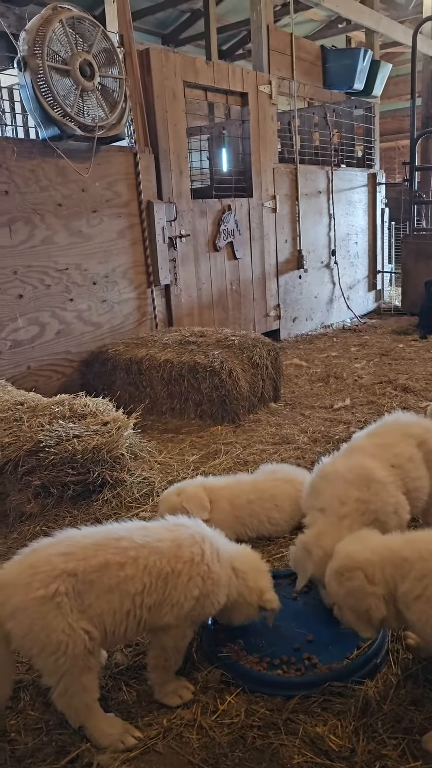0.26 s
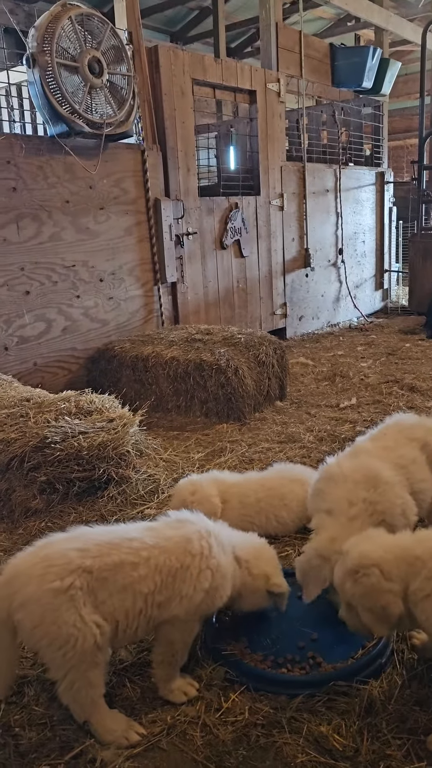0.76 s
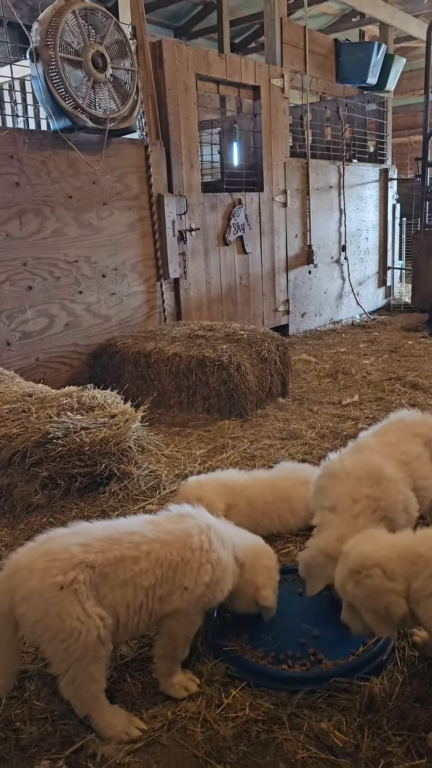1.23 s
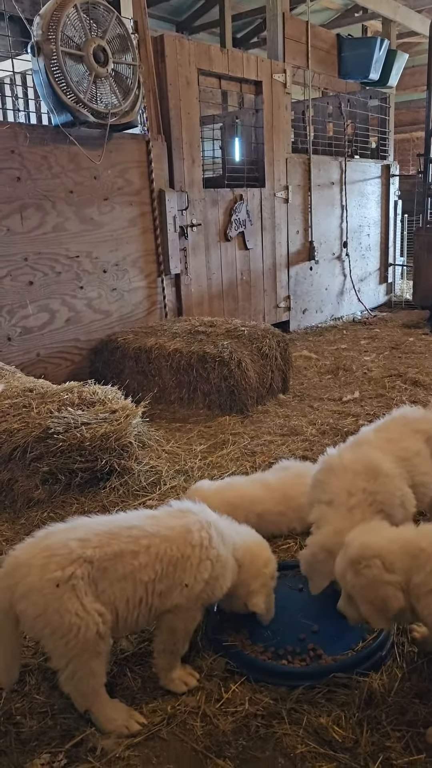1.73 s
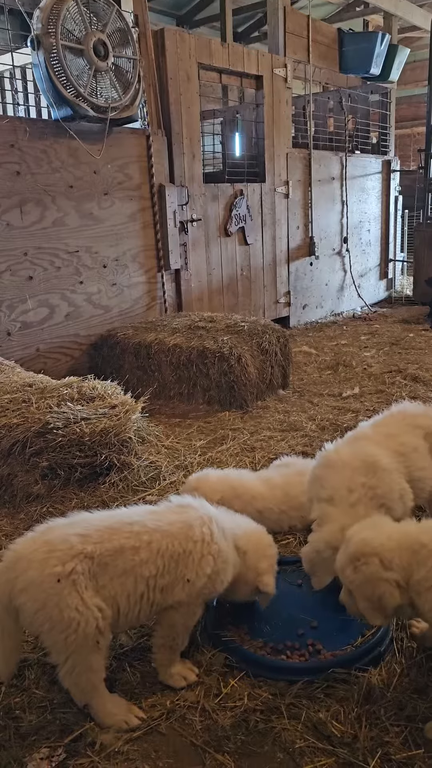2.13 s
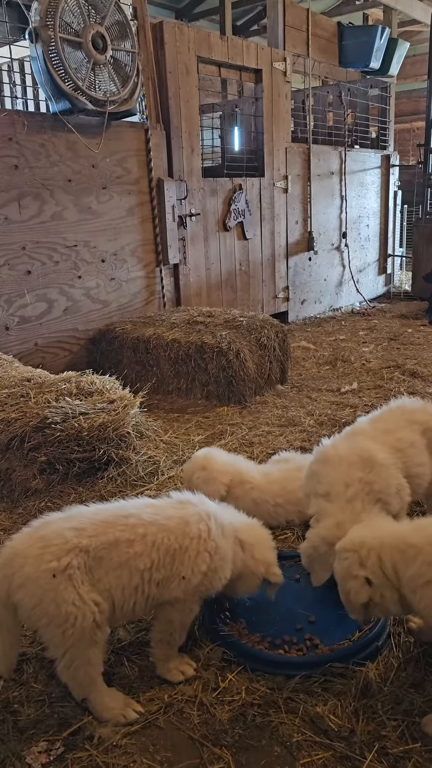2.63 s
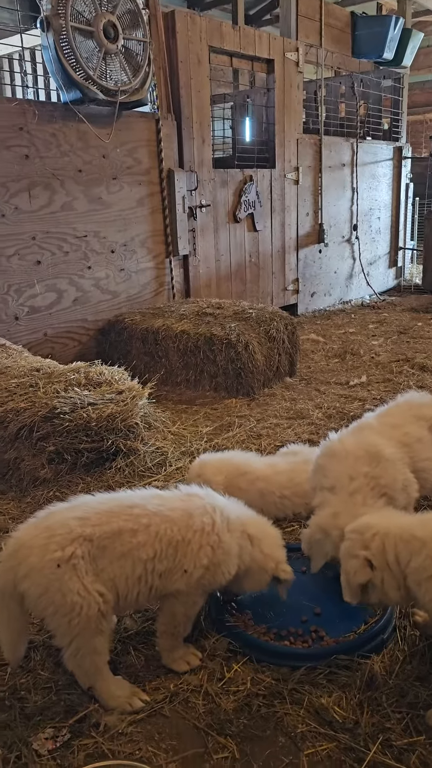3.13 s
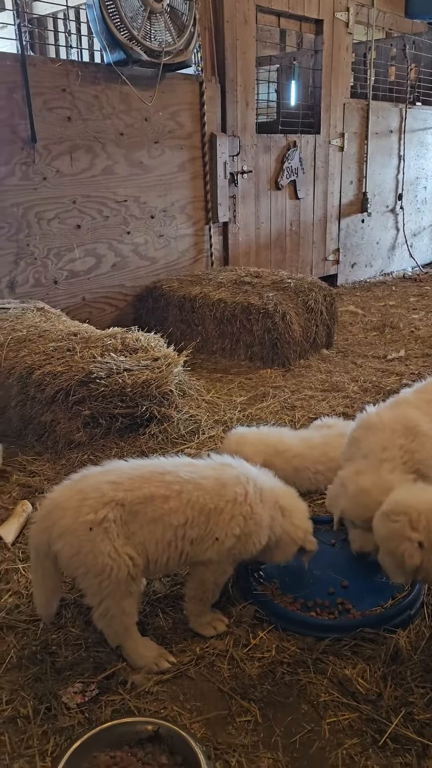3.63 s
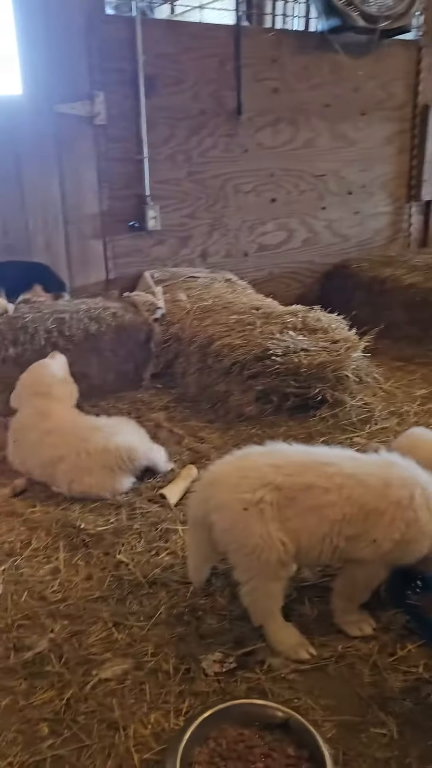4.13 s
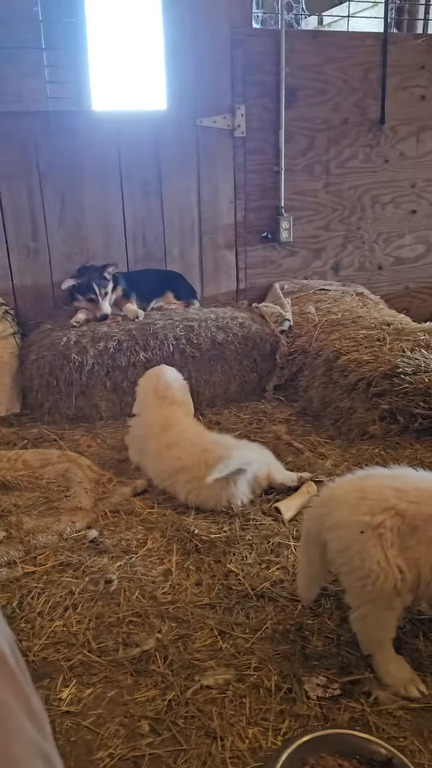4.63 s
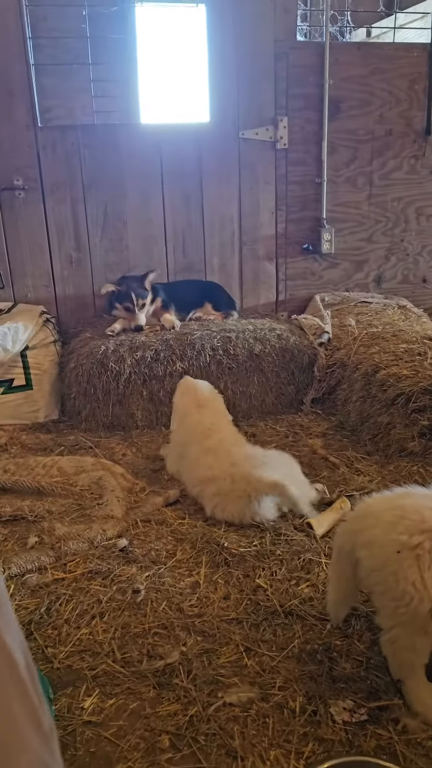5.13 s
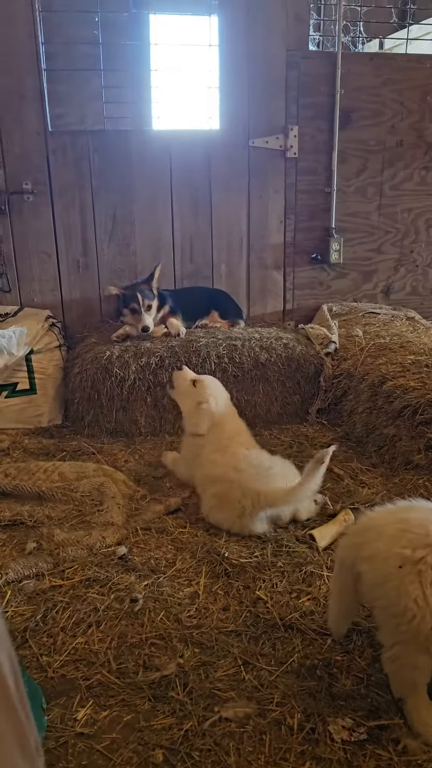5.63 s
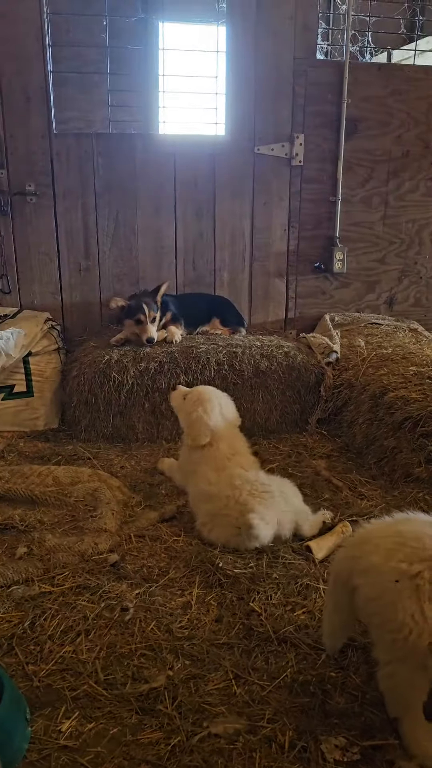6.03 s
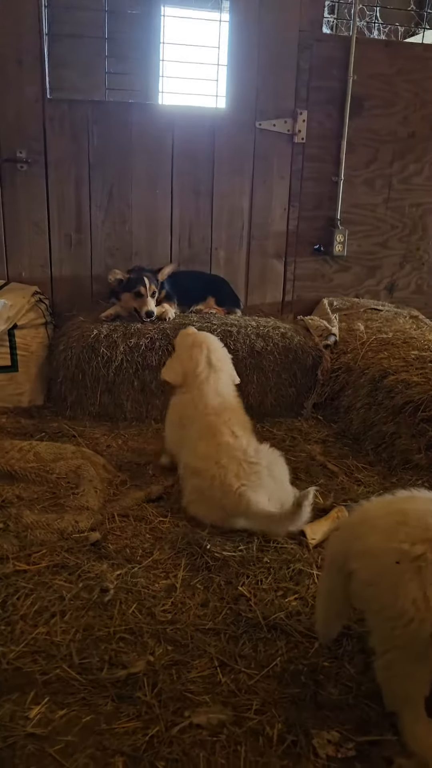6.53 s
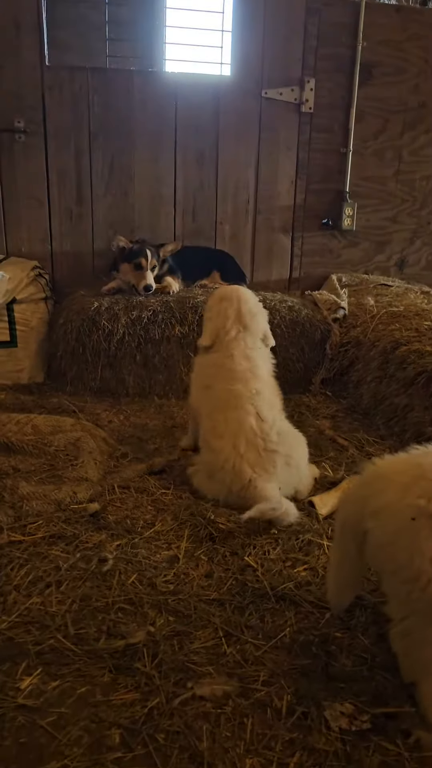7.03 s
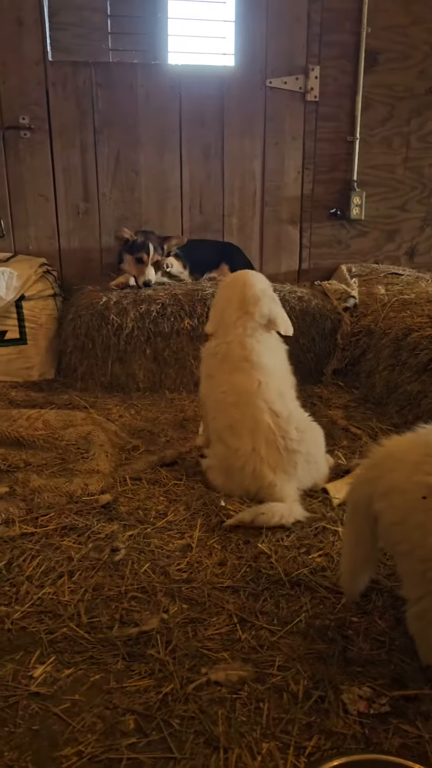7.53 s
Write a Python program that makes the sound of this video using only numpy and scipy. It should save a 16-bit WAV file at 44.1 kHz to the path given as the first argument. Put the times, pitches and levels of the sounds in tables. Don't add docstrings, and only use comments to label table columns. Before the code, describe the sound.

In a wooden barn, a puppy gives two gruff low barks, two short growls, then five loud sharp yaps over crunching kibble and rustling straw.

```python
import sys
import numpy as np
from scipy import signal
from scipy.fft import rfft, irfft
from scipy.io import wavfile
from scipy.ndimage import uniform_filter1d

SR = 44100
rng = np.random.default_rng(int(sys.argv[2]) if len(sys.argv) > 2 else 0)


def to_wav(s):
    ch = np.atleast_2d(s).T
    pcm = np.round(np.clip(ch, -1, 1) * 32767)
    wavfile.write(sys.argv[1], SR, pcm.astype(np.int16))


def gain_from_decibels(decibels):
    exponent = np.asarray(decibels, float) / 20
    return 10 ** exponent


N = 342657

# (time [s], pitch [Hz], effort [dB])
YAP_CURVES = [
    [(5.195, 193.8, -49), (5.25, 394, -34.5), (5.285, 607, -21), (5.312, 762.4, -12), (5.332, 817, -9),
     (5.358, 847.3, -10.5), (5.385, 890.4, -28.5), (5.42, 718, -32), (5.51, 312, -49.5)],
    [(5.585, 243.5, -45), (5.62, 464.7, -35), (5.655, 687.3, -15.5), (5.677, 787, -6.5),
     (5.705, 826, -18.5), (5.74, 802.3, -13), (5.78, 606.4, -32), (5.82, 425.3, -27.5), (5.87, 324, -74)],
    [(6.375, 331, -61.5), (6.4, 490.4, -29), (6.43, 621, -23), (6.45, 695, -13), (6.467, 757, -10.5),
     (6.5, 818, -22), (6.535, 795, -38), (6.58, 509, -49), (6.64, 304, -49.5)],
    [(6.655, 324, -54), (6.69, 528, -28), (6.72, 671, -18), (6.75, 824.2, -12.5), (6.785, 832.4, -14),
     (6.815, 793.7, -25.5), (6.85, 630, -32.5), (6.9, 393.5, -36), (6.96, 267, -52)],
    [(7.33, 253, -58), (7.372, 489.2, -29), (7.408, 734, -13), (7.445, 849, -8.5), (7.475, 861.5, -25.5),
     (7.49, 814, -12.5), (7.505, 735, -38.5), (7.54, 472.6, -30.5), (7.6, 305, -53)],
]
# (voice breaks at [s], depth of strong-weak pulses after it [ratio], brightness [dB per octave])
YAP_BREAKS = [
    (5.345, 1.03, 4),
    (5.689, 1.27, -2.1),
    (6.484, 1.9, -4.5),
    (6.742, 2.16, 0.5),
    (7.424, 0.55, 5.3),
]
YAP_HOARSENESS = [
    (.07, .1),
    (.065, .08),
    (.16, .15),
    (.07, .06),
    (.04, .09),
]
YAP_WIDE_OPEN = (0.68, 0.63, 0.7, 0.73, 0.68)
# (frequency [Hz], level [dB])
YAP_THROAT_COLOUR = [(250, -47), (420, -43), (560, -2), (800, 2.5), (1000, -12.5), (1260, 1), (1690, -11.5),
                     (2130, -6.5), (2500, -18), (3200, -22.5), (4200, -41), (5200, -47), (6500, -97.5)]
TONGUE_BANDS_HZ = (620, 770, 970, 1300, 1800, 2100, 2850, 3600, 4300, 4800)
TONGUE_CLIMBING = [
    (-5, 1.5, -16.5, -7, -4, 2.5, 1.5, 7, -2, -6),
    (0, 1.5, -2, -7.5, -11.5, 1.5, 1.5, 2, -3.5, -2),
    (-4, 1.9, -3, -7.5, 13, 4.4, 1.2, 14, 12, -5),
    (2, 2.1, 6, -11, 5.5, 1.4, -1.6, -1, -3.5, -6),
    (6.5, 1.5, 7.5, 3.5, -6, 4.9, 1.5, -4.5, -1, -9),
]
TONGUE_BROKEN = [
    (0.1, 0.1, -0.6, 1.5, 1, -0.5, 4, -4, -9, 15.5),
    (0.1, 0.1, -4, 0.1, -1.5, 4, 3, 5, 1.5, 14.5),
    (0.099, 0.1, -1.5, 0.1, 16, -7.5, -7.5, 1.5, 6.5, 1.5),
    (0.1, 0.1, 4.5, 0.1, 8.5, -1.5, -2, -1, -3, -7),
    (0.1, 0.1, 5.5, 1.5, -2, 0.5, -1.5, -11, -1, 9),
]

# (time [s], pitch [Hz], effort [dB])
WOOF_CURVES = [
    [(1.07, 144, -59), (1.125, 156, -38), (1.14, 191.7, -38.5), (1.15, 224, -39), (1.175, 247, -23.5),
     (1.21, 309, -23.5), (1.255, 316.6, -22), (1.275, 278.2, -25), (1.32, 209, -57)],
    [(2.185, 152.3, -79), (2.212, 163, -34), (2.228, 236, -27), (2.255, 271.9, -23.5), (2.29, 282.5, -18.5),
     (2.315, 274.8, -30), (2.335, 251.8, -22), (2.4, 210.5, -69)],
]
# (voice breaks at [s], depth of strong-weak pulses [ratio])
WOOF_SPLITS = [
    (1.12, 0.74),
    (2.201, 0.5),
]
WOOF_MOUTH_RULE = (0.46, 0.91, 0.012)
# (frequency [Hz], level [dB])
WOOF_EARLY_THROATS = [
    [(100, -48), (290, 1.5), (560, -1.5), (760, 14), (1000, 7.5), (1240, 14.5), (1500, -16), (1850, 3),
     (2300, -24), (2900, 6), (3500, 2.5), (4000, -11), (4500, -33), (5300, -48), (6200, -110)],
    [(100, -26.5), (290, 0), (600, -9.5), (950, 18.5), (1300, -2), (1650, -6.5), (2000, -9), (2500, -8),
     (3000, -7), (3500, -10.5), (4000, -7.5), (5300, -44.5), (6200, -83)],
]
# (frequency [Hz], level [dB])
FIRST_WOOF_THROAT = [(100, -42), (290, -12), (560, -1), (800, 3.5), (1000, 3.5), (1270, 16.5), (1550, -17),
                     (1870, 7), (2250, 7), (2550, 9), (2950, 6), (3300, -3), (3850, -4.5), (4400, -36),
                     (5300, -48), (6200, -114)]
# (frequency [Hz], level [dB])
SECOND_WOOF_OPEN = [(100, -29.5), (290, -20.5), (520, 4), (700, -9.5), (850, 7), (1100, -7.5), (1280, 13),
                    (1450, -23.5), (1680, 10), (1950, 9.5), (2500, 8.5), (2750, 1.5), (3050, 1), (3600, -4),
                    (4100, -22), (5300, -22.5), (6200, -81)]
# (time [s], duration [s])
JAW_FALLS = [
    (1.213, 0.016),
    (2.259, 0.038),
]

# (start [s], length [s], effort [dB], first pulse rate [Hz], last pulse rate [Hz])
GROWL_EVENTS = [
    (2.78, .52, -26.5, 99.9, 21.94),
    (3.765, 0.445, -29, 45.5, 50.53),
]
GROWL_ATTACK = (0.091, 0.058)
GROWL_RELEASE = (0.06, 0.14)
GROWL_SAG = (-10, 0.5)
# (start [dB], end [dB])
GROWL_ENDS = (-20, -30.5)
# (start [dB], end [dB])
GROWL_BRIGHTNESS = (0.5, -4)
GROWL_SLACKENING = (.48, 0.53)
GROWL_UNSTEADY = (.16, .04)
FLAP_SWELLS = (2.5, 1)
JAW_SETTLE = (.14, .095)
# (frequency [Hz], width [Hz], level [dB], frequency at start [Hz])
GROWL_CHESTS = [
    [(150, 42, 2, 124), (217, 54, -2.5, 168), (348, 64, -1.5, 500), (720, 43, -9, 803),
     (1090, 72, -20.5, 1390)],
    [(160, 28.6, -1, 155), (209, 42, -1.5, 220), (262, 37, -13.5, 240), (338, 33, -4.5, 307),
     (465, 37, -14.5, 394), (855, 24, -8.5, 1050), (1020, 59, -17, 1330), (1185, 60, -20, 1200)],
]
# (frequency [Hz], level [dB])
GROWL_COLOUR = [(50, -40), (90, -12), (125, 0)]

# (start [s], length [s], pitch [Hz], effort [dB])
GRUMBLES = [
    (1.515, 0.049, 147, -43.5),
    (1.59, 0.049, 144.3, -34),
    (1.635, 0.066, 156.8, -37.5),
    (1.705, 0.043, 141, -50),
    (5.506, 0.093, 156.6, -36),
    (6.6, 0.056, 150, -44.5),
    (6.364, .04, 201, -48.5),
]
# (frequency [Hz], level [dB])
NOSE_COLOUR = [(60, -25), (150, 4.5), (230, 5.5), (320, -7.5), (500, -24.5), (1200, -32.5)]
# (frequency [Hz], level [dB])
SHUT_MOUTH = [(50, -29.5), (150, 2.5), (300, 4), (500, -15.5), (1000, -24), (2500, -56), (6000, -82.5)]
# (frequency [Hz], density [dB per Hz])
PUFF_COLOUR = [(1470, -29), (2500, -3.5), (2680, -26), (3000, -22.5), (3720, -16.5), (4400, -25),
               (5170, -25), (6030, -59), (6410, -55.5), (7300, -26.5), (10400, -40), (12100, -28.5),
               (15600, -58)]

# (time [s], peak [dB],
# frequency [Hz], left minus right [dB])
STALK_SNAPS = [(0.29, -53, 3310, -7), (0.4269, -54.5, 2650, -6), (0.4984, -62, 3410, -7.5),
               (0.515, -58, 4100, -6.5), (0.5703, -66, 2500, -4.0), (0.6582, -52.5, 3260, -7),
               (0.688, -58.5, 4300, -4.5), (0.821, -52, 3600, -8), (0.8586, -54, 3150, -8),
               (1.068, -51, 4150, 0), (1.3945, -54, 2570, -5.5), (2.017, -61, 3090, -5.5),
               (2.0312, -49, 4000, -8), (2.15, -60, 3440, -11), (2.1845, -51.5, 4330, -9),
               (2.4842, -47, 2700, -4), (2.8006, -44.5, 3370, 0), (3.0853, -51, 3940, -9),
               (3.1038, -54, 4360, -6), (3.2033, -49.5, 3760, -7), (3.3218, -47.5, 3040, -7),
               (3.4897, -53, 3260, -7), (3.5423, -43.5, 3370, 3), (3.5751, -38, 3300, -3),
               (3.6294, -49, 4370, -5), (4.2827, -52, 3170, -2), (4.607, -44, 3380, -4),
               (4.688, -53, 2900, -9), (5.859, -48.5, 4530, -5), (5.9203, -57.5, 3270, -3.0),
               (6.0029, -50, 4400, -9), (6.038, -47.5, 4300, -2), (6.0705, -46, 4030, -4),
               (6.1873, -68, 3100, 0), (6.3592, -40.5, 3120, -4), (6.823, -37.5, 3280, -3),
               (7.137, -43.5, 4250, -7),
               (5.505, -46, 4400, -6),
    (5.627, -45, 4500, -6),
    (6.388, -45, 4500, -9),
    (6.657, -49, 4300, -8),
    (6.3588, -41, 1600, -9),
    (6.549, -30, 900, -5),
    (6.3588, -44, 750, -4),
    (7.136, -42, 700, -4),
    (6.0705, -50, 1500, -6),
    (6.039, -52, 1500, -6),
]
# (time [s], peak [dB], frequency [Hz], t60 [s])
KIBBLE_KNOCKS = [(1.454, -41, 1222, 0.043), (1.49, -31.5, 250, 0.039), (1.524, -40.5, 1050, 0.074),
                 (1.75, -47.5, 1160, 0.05), (2.054, -42, 1020, 0.099), (3.285, -36, 825, 0.07),
                 (3.328, -37.5, 1410, 0.13), (3.325, -35, 770, 0.073), (3.36, -47, 2130, .08),
                 (3.59, -48, 1300, .06), (3.642, -44, 1300, 0.055), (3.665, -46, 1450, 0.14),
                 (4.479, -48.5, 1300, 0.093), (1.5, -41.5, 1090, 0.057), (2.018, -54, 1350, 0.049),
                 (2.18, -42, 890, 0.051), (.06, -55, 1410, 0.75), (.94, -48, 543, 0.093),
                 (7.315, -43, 1356, 0.078), (3.544, -46, 1150, 0.18), (3.663, -41, 875, 0.071),
                 (3.712, -42.5, 1320, 0.042), (4.479, -38.5, 895, 0.078), (6.082, -28.5, 482, 0.029),
                 (6.099, -38, 634, 0.035)]
# (time [s], peak [dB], frequency [Hz], t60 [s])
STRAW_SCRAPES = [
    (4.744, -39.5, 3880, 0.12),
    (4.8234, -39, 3500, 0.051),
    (5.022, -40.5, 3600, 0.067),
    (5.032, -33.5, 3530, 0.073),
    (5.05, -38.5, 3330, 0.16),
    (5.196, -45.5, 3570, 0.095),
    (5.2145, -42, 3080, 0.68),
]
# (time [s], peak [dB], frequency [Hz], t60 [s])
PAW_LANDINGS = [
    (.295, -46, 220, .2),
    (2.71, -48, 200, .1),
    (6.543, -20, 600, .05),
    (6.547, -25, 200, .04),
    (6.547, -28, 80, .07),
    (6.932, -31, 330, .04),
]

# (time [s], spread [s], straw [dB], bodies [dB])
STRAW_SHUFFLES = [(0.102, 0.11, -54, -55), (0.399, 0.25, -62, -56.5), (.85, 0.27, -67.5, -59.5),
                  (1.4, 0.23, -60.5, -56.5), (1.55, 0.16, -61, -59.5), (1.689, 0.082, -56.5, -61),
                  (2.14, 0.13, -61.5, -55.5), (2.4, 0.098, -62.5, -44), (2.876, 0.074, -53.5, -39.5),
                  (3.05, 0.45, -62.5, -60.5), (3.33, 0.11, -60.5, -50.5), (3.6, 0.097, -60.5, -52),
                  (3.78, 0.11, -55, -50.5), (3.982, 0.13, -46, -48), (4.28, 0.27, -55.5, -56),
                  (4.618, 0.096, -48, -52.5), (4.786, 0.17, -46.5, -46.5), (5.099, 0.13, -50.5, -48),
                  (5.349, 0.14, -57, -43.5), (5.6, 0.29, -64.5, -40), (6.116, 0.04, -56.5, -53),
                  (6.6, 0.15, -67, -37.5), (6.951, 0.37, -54, -57), (7.15, 0.1, -49, -58),
                  (7.32, 0.29, -52.5, -49), (7.65, 0.26, -62, -55.5)]
# (time [s], spread [s], rumble [dB])
BOARD_THUDS = [
    (.4, 0.23, -53),
    (1.03, 0.14, -64),
    (2.8, 0.11, -51.5),
    (3.35, 0.09, -54),
    (3.7, 0.17, -53),
    (6.301, 0.74, -61.5),
    (1.6, 0.15, -55),
]
# (time [s], spread [s], level [dB])
TREBLE_HISSES = [
    (.03, 0.056, -70),
    (.45, 0.065, -77),
    (1.6, 0.11, -76),
    (2.12, 0.11, -78.5),
    (2.9, 0.078, -71.5),
    (3.25, 0.11, -72.5),
    (3.99, .05, -71.5),
    (4.28, .08, -68.5),
    (7.17, 0.051, -74.5),
]
# (straw [dB], bodies [dB], rumble [dB], top hiss [dB])
REST_LEVELS = (-67.5, -63.5, -58, -92.5)
# (frequency [Hz], density [dB per Hz])
STRAW_COLOUR = [(880, -32.5), (1500, -15.5), (1670, -21), (1900, -3), (2830, -5.5), (3620, -4.5),
                (4900, -9.5), (5300, -14.5), (7540, -21.5), (9260, -39.5), (10300, -48.5), (11200, -34.5),
                (11700, -32), (15600, -44)]
# (frequency [Hz], density [dB per Hz])
BODY_COLOUR = [(59, -40), (100, -18), (242, 3), (458, -3.5), (822, -1.5), (1670, -4.5), (3000, -28),
               (3900, -31.5), (6600, -120)]
# (frequency [Hz], density [dB per Hz])
RUMBLE_COLOUR = [(12, -39.5), (20, -13), (59, -2.5), (97, -13), (200, -16.5), (260, -40.5), (440, -120)]
# (frequency [Hz], density [dB per Hz])
HISS_COLOUR = [(9500, -60), (10800, -26.5), (11300, 3.1), (13500, -3.5), (15600, -9)]
# (frequency [Hz], left-right likeness [-1 to 1])
LIKENESS = [(60, 0.9), (180, 0.99), (550, 0.37), (1650, -0.22), (4970, -0.043), (15000, 0.003)]

# (frequency [Hz], t60 [s])
BARN_RING = [(150, 0.34), (400, 0.46), (800, 0.43), (1250, 0.3), (2760, 0.35), (7280, 0.29)]
# (delay [s], left [dB], right [dB])
FIRST_ECHOES = [
    (.0021, -14.5, -22),
    (.0037, -15.5, -13),
    (.0068, -16, -10.5),
    (.0103, -16.5, -12),
]
# (frequency [Hz], left minus right [dB])
PORT_BALANCE = [(60, 1), (330, -1), (770, -0.4), (2300, -0.5), (4300, -9), (5800, 5), (8000, 12),
                (11500, -16)]


def puppy():
    out = np.zeros(N)
    yaps(out)
    woofs(out)
    grumbles(out)
    growls(out)
    return out


def yaps(out):
    shut, pinch = 0.44, 0.43
    rows = zip(YAP_CURVES, YAP_BREAKS, YAP_HOARSENESS, YAP_WIDE_OPEN, TONGUE_CLIMBING, TONGUE_BROKEN)
    for curve, (break_s, split, bright_db), hoarse, wide, early, late in rows:
        path = gesture(curve, break_s, split, (shut, wide, pinch))
        throat = tongued(early), tongued(late), break_s, 0.015
        add(out, *voice(path, throat, puff_db=-30.5, hoarse=hoarse, jitter=hoarse[1] / 16,
                        smear_hz=74.0, count=18, bright_db=bright_db))


def woofs(out):
    late_throats = FIRST_WOOF_THROAT, SECOND_WOOF_OPEN
    rows = zip(WOOF_CURVES, WOOF_SPLITS, WOOF_EARLY_THROATS, late_throats, JAW_FALLS)
    for curve, split, early, late, jaw in rows:
        path = gesture(curve, *split, WOOF_MOUTH_RULE)
        add(out, *voice(path, (early, late, *jaw), puff_db=-26, hoarse=(.017, 0.89 * .017),
                        jitter=.007, smear_hz=49.0, count=38))


def grumbles(out):
    for row in GRUMBLES:
        add(out, *voice(hum(*row), (NOSE_COLOUR, NOSE_COLOUR, 0, 1), puff_db=-45, hoarse=(.13, .13),
                        jitter=.015, smear_hz=30, count=16))


def growls(out):
    rows = zip(GROWL_EVENTS, GROWL_ATTACK, GROWL_RELEASE, GROWL_SAG, GROWL_CHESTS, FLAP_SWELLS,
               GROWL_UNSTEADY, JAW_SETTLE)
    for row, rise, fall, sag_db, chest, swell_db, drift, settle_s in rows:
        add(out, *growl(rasp(*row, rise, fall, sag_db), chest, swell_db, drift, settle_s))


def voice(rows, throat, puff_db, hoarse, jitter, smear_hz, count, bright_db=0):
    s, *columns = np.transpose(rows)
    t = np.arange(s[0], s[-1], 1 / SR)
    hz, effort_db, uneven, mouth = (np.interp(t, s, c) for c in columns)
    uneven = abs(uneven)
    mouth = np.clip(mouth, 0, 1)

    climb = uniform_filter1d(np.gradient(np.log(hz)) * SR, size=600)
    pressed_db = bright_db + np.clip(0.66 * climb, 0, 5) + np.clip(1.9 * climb, -7, 0)
    hz = hz * (1 + jitter * wander(len(t), 68))
    turns = np.cumsum(hz) / SR
    k = np.arange(1, count + 1)[:, None] / 2
    line_hz = k * hz

    early, late, change_s, takes_s = throat
    changed = .5 + .5 * np.tanh(2 * (t - change_s) / takes_s)
    colour_db = (1 - changed) * read(early, line_hz) + changed * read(late, line_hz)
    tilt_db = pressed_db * np.log2(1 + line_hz / 900)
    height = mouth ** (1 + line_hz / 700) * gain_from_decibels(colour_db + tilt_db)
    height = height + (1 - mouth) * gain_from_decibels(read(SHUT_MOUTH, line_hz))

    half_lines = uneven * np.minimum(1, 1.68 / k) + 3.5 * hoarse[0] * (k > 2)
    whole_lines = 1 / (1 + 0.14 * uneven * (k > 1))
    height = height * np.where(k % 1, half_lines, whole_lines)
    height = height * gain_from_decibels(2.2 * wander(height.shape, 30))
    height[0] *= .15 * (1 - mouth)

    smear = wander((count, len(t)), smear_hz) + 1j * wander((count, len(t)), smear_hz)
    hoarse_now = hoarse[0] + (hoarse[1] - hoarse[0]) * changed
    smeared = np.minimum(hoarse_now * k ** 1.6 / 1.65, .9)
    lag = rng.random((count, 1))
    spin = np.exp(2j * np.pi * (k * turns + lag))
    lines = height * ((1 - smeared + smeared * smear) * spin).real
    tone = lines.sum(0) / np.sqrt((height ** 2).sum(0) / 2)

    gusts = .5 + np.exp(-(turns % 1) / 0.57)
    puffs = evened(coloured(gusts * rng.standard_normal(len(t)), PUFF_COLOUR))
    call = gain_from_decibels(effort_db) * (tone + gain_from_decibels(puff_db) * mouth * puffs)
    return s[0], call * signal.windows.tukey(len(t), .05)


def gesture(curve, break_s, split, mouth_rule):
    s, hz, effort_db = np.transpose(curve)
    t = np.linspace(s[0], s[-1], num=100)
    hz, effort_db = np.interp(t, s, hz), np.interp(t, s, effort_db)
    shut, wide, pinch = mouth_rule
    opening = np.clip((hz / hz.max() - shut) / (wide - shut), 0, 1)
    broken = np.clip((t - break_s) / 0.015, 0, 1)
    uneven = 0.29 * (1 - opening) + split * broken * opening ** 0.66
    mouth = opening - pinch * np.exp((effort_db - effort_db.max()) / 8)
    return np.column_stack([t, hz, effort_db, uneven, mouth])


def tongued(colour_db):
    tongue = list(zip(TONGUE_BANDS_HZ, colour_db))
    return [(hz, db + read(tongue, hz)) for hz, db in YAP_THROAT_COLOUR]


def hum(start, length, hz, effort_db):
    u = np.linspace(0, 1, num=30)
    bow = (2 * u - 1) ** 2
    pitch = hz * (1 + .12 * (.5 - bow))
    split, mouth = .35 + 0 * u, 1 + 0 * u
    return np.column_stack([start + u * length, pitch, effort_db - 18 * bow, split, mouth])


def growl(rows, chest, swell_db, drift, settle_s):
    s, *columns = np.transpose(rows)
    t = np.arange(s[0], s[-1], 1 / SR)
    rate, effort_db, bright_db = (np.interp(t, s, c) for c in columns)
    turns = np.cumsum(rate * np.exp(drift * wander(len(t), 25))) / SR
    flap_db = 1.6 * wander(len(t), 340) + swell_db * wander(len(t), 29)
    flaps = (np.diff(np.floor(turns), prepend=0) > 0) * gain_from_decibels(flap_db)
    breath = rng.standard_normal(len(t)) * np.exp(-(turns % 1) / 0.8)
    drive = evened(flaps / rate ** 0.29) + 0.5 * breath

    lift = 1 + .018 * wander(len(t), 12)
    opened, rings = np.exp(-((t - s[0]) / settle_s) ** 2), 0
    for hz, width, db, first_hz in chest:
        path = (hz + (first_hz - hz) * opened) * lift
        width = max(width, 45 * (180 < hz < 600))
        ring = evened(resonate(resonate(drive, path, width), path, 3 * width))
        rings = rings + gain_from_decibels(db + bright_db * 0.64 * np.log2(hz / 150)) * ring
    call = gain_from_decibels(effort_db - 7.5) * coloured(rings, GROWL_COLOUR)
    return s[0], call * signal.windows.tukey(len(t), .05)


def rasp(start, length, effort_db, first, last, rise, fall, sag_db):
    t = np.linspace(0, length, num=60)
    first_db, last_db = GROWL_ENDS
    level_db = effort_db + np.interp(t, [0, rise, length - fall, length], [first_db, 0, sag_db, last_db])
    rate = first * (last / first) ** np.interp(t / length, GROWL_SLACKENING, [0, 1])
    bright_db = np.interp(t, [0, length], GROWL_BRIGHTNESS)
    return np.column_stack([start + t, rate, level_db, bright_db])


def small_sounds():
    out, t = np.zeros((2, N)), np.arange(5000) / SR
    snaps(out, t)
    for rows, fuzz, wide in ((KIBBLE_KNOCKS, .13, .35), (STRAW_SCRAPES, .085, .4), (PAW_LANDINGS, .2, .5)):
        knocks(out, t, rows, fuzz, wide)
    return out


def snaps(out, t):
    for s, db, hz, pan_db in STALK_SNAPS:
        tick = np.sin(2 * np.pi * hz * t) + 0.55 * wander(len(t), 6000)
        decay = gain_from_decibels(db + 10 - 60 * t / 0.004) * (1 - np.exp(-t / 0.0003))
        add(out, s, sides(pan_db - 1) * decay * tick)


def knocks(out, t, rows, fuzz, wide):
    for s, db, hz, t60 in rows:
        noise = rng.standard_normal((2, len(t)))
        noise = noise + 2.0 * noise[::-1]
        pitched = evened(resonate(resonate(noise, hz, fuzz * hz), hz, 2 * fuzz * hz))
        body = evened(resonate(resonate(noise, hz, min(hz, 1200)), hz, min(2 * hz, 1600)))
        decay = gain_from_decibels(db - 2.5 - 60 * t / t60) * (1 - np.exp(-t * SR / 60))
        add(out, s, decay * (pitched + wide * body))


def stirring():
    frames, hz = N // 128 + 5, np.fft.rfftfreq(512, 1 / SR)
    s, spread, straw_db, bodies_db = np.transpose(STRAW_SHUFFLES)
    straw_rest, bodies_rest, rumble_rest, hiss_rest = REST_LEVELS
    layers = [  # colour, level, patchiness dB, flicker dB
        (STRAW_COLOUR, swells(s, spread, straw_db, straw_rest), 2.4, 1.52),
        (BODY_COLOUR, swells(s, spread, bodies_db, bodies_rest), 3.2, 1.1),
        (RUMBLE_COLOUR, swells(*np.transpose(BOARD_THUDS), rumble_rest), 2.9, .6),
        (HISS_COLOUR, swells(*np.transpose(TREBLE_HISSES), hiss_rest), 1.5, 1.6)]
    same, out = np.clip(read(LIKENESS, hz), -1, 1)[:, None], 0
    for colour, level, patchy_db, flicker_db in layers:
        a, b, c, d, patches = rng.standard_normal((frames, 257, 5)).T
        patches = uniform_filter1d(patches, size=6, axis=0)
        patches = evened(uniform_filter1d(patches, size=20, axis=1))
        flicker = rng.exponential(1, frames) - 1
        left = a + 1j * b
        right = same * left + np.sqrt(1 - same ** 2) * (c + 1j * d)
        z = np.array([left, right])
        z *= gain_from_decibels(read(colour, hz)[:, None] + patchy_db * patches + flicker_db * flicker)
        layer = evened(signal.istft(z, nperseg=512, noverlap=384)[1][:, :N])
        out = out + layer * level
    passing = np.exp(-((np.arange(N) / SR - 4.75) / 0.1) ** 2)
    return out * sides(-7.5 * passing)


def swells(s, spread, db, rest_db):
    t = np.arange(0, N, 128) / SR
    moves = gain_from_decibels(2 * db) * np.exp(-2 * ((t[:, None] - s) / spread) ** 2)
    power = gain_from_decibels(2 * rest_db) + moves.sum(1)
    return np.interp(np.arange(N) / SR, t, np.sqrt(power))


def echoes(x):
    far = x - uniform_filter1d(x, size=120)
    return sum(gain_from_decibels(np.array([[left_db], [right_db]])) * np.roll(far, round(s * SR))
               for s, left_db, right_db in FIRST_ECHOES)


def barn(x):
    taps = np.zeros((2, SR))
    at = np.arange(200, SR - 20, 20) + rng.integers(0, 20, (2, (SR - 201) // 20))
    np.put_along_axis(taps, at, rng.choice([-1., 1.], at.shape), 1)
    hz, t, z = signal.stft(taps, SR, nperseg=256)
    same = 1 / (1 + (hz[:, None] / 300) ** 2)
    z[1] = same * z[0] + np.sqrt(1 - same ** 2) * z[1]
    shape = gain_from_decibels(-60 * t / read(BARN_RING, hz)[:, None]) * (1 - np.exp(-t / 0.00093))
    tail = signal.istft(z * shape, SR, nperseg=256)[1]
    return signal.fftconvolve(x[None], tail / np.linalg.norm(tail[0]), axes=1)[:, :N]


def evened(x):
    return x / np.sqrt(np.mean(abs(x) ** 2) + 1e-20)


def read(points, hz):
    f, value = np.transpose(points)
    return np.interp(np.log(hz + 1), np.log(f + 1), value)


def add(mix, s, sound):
    part = mix[..., round(s * SR):][..., :sound.shape[-1]]
    part += sound[..., :part.shape[-1]]


def wander(shape, hz):
    return evened(signal.lfilter(*signal.butter(2, hz, fs=SR), rng.standard_normal(shape)))


def coloured(x, points):
    hz = np.fft.rfftfreq(x.shape[-1], 1 / SR)
    return irfft(rfft(x) * gain_from_decibels(read(points, hz)), x.shape[-1])


def sides(pan_db):
    return gain_from_decibels(np.array([[.5], [-.5]]) * pan_db)


def resonate(x, hz, width):
    turn = np.exp(2j * np.pi * np.cumsum(hz * np.ones(x.shape[-1])) / SR)
    r = np.exp(-np.pi * width / SR)
    return 2 * (turn * signal.lfilter([1 - r], [1, -r], x * turn.conj())).real


def scene():
    dog, small = puppy(), small_sounds()
    direct = gain_from_decibels(1.0) * np.array([dog, np.roll(dog, 3)]) * sides(0.28)
    nearby = gain_from_decibels(-11) * small.mean(0)
    return direct + echoes(dog) + small + barn(gain_from_decibels(-2.0) * dog + nearby) + stirring()


def top_cut(x):
    return signal.sosfilt(signal.butter(12, 15710, fs=SR, output="sos"), x)


def record(dry):
    hz = np.fft.rfftfreq(N + 1, 1 / SR)
    balanced = rfft(dry, N + 1) * sides(read(PORT_BALANCE, hz))
    ports = irfft(balanced, N + 1)[:, :N]
    return top_cut(1.199 * np.tanh(ports / 1.418))


dry = scene()
out = record(dry)
to_wav(out)
```